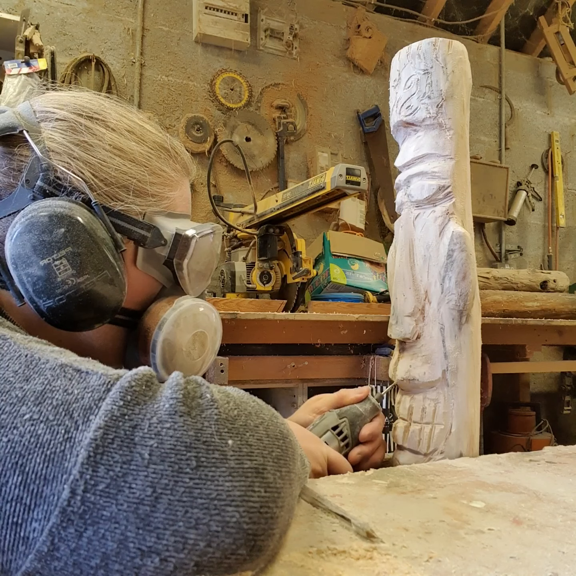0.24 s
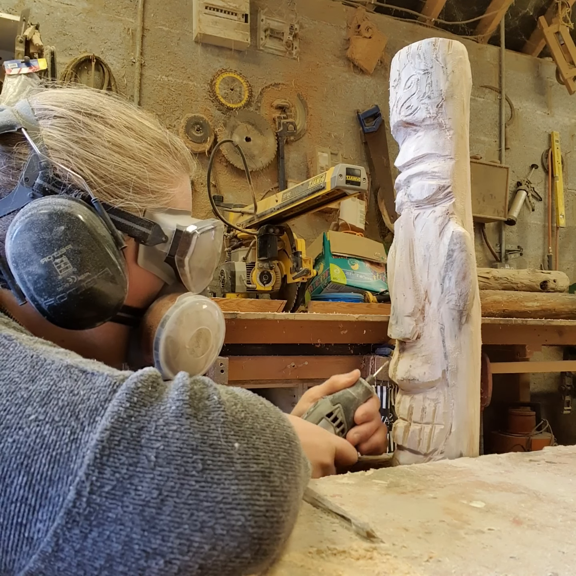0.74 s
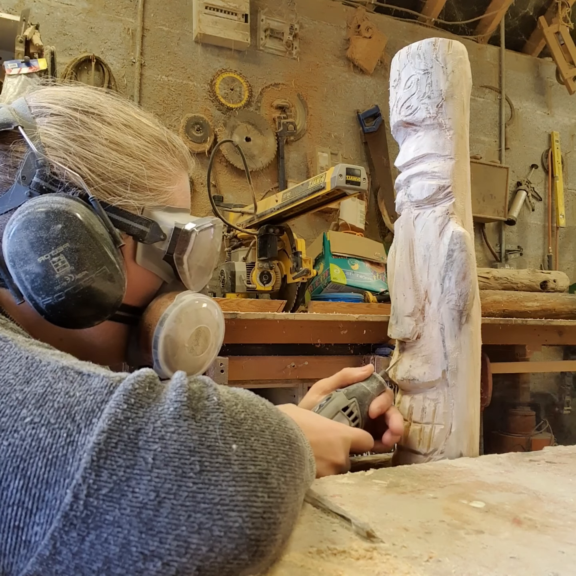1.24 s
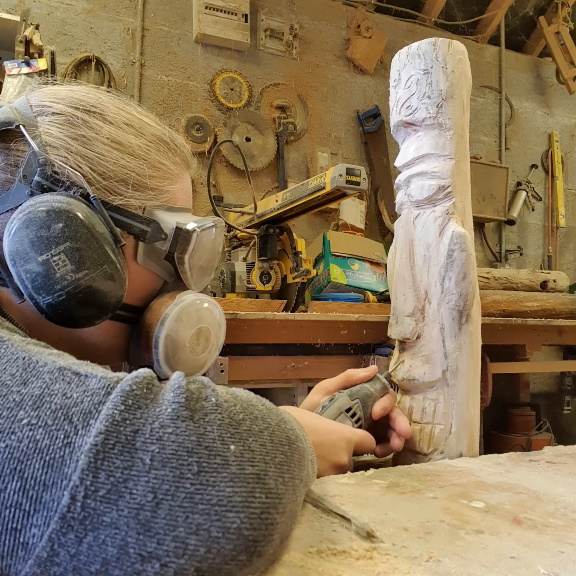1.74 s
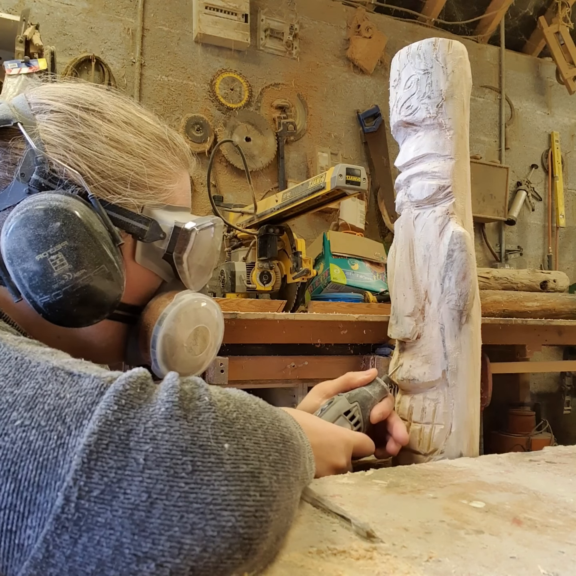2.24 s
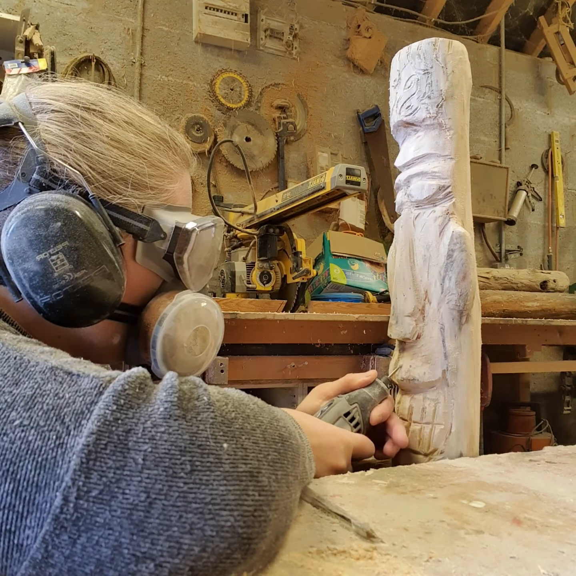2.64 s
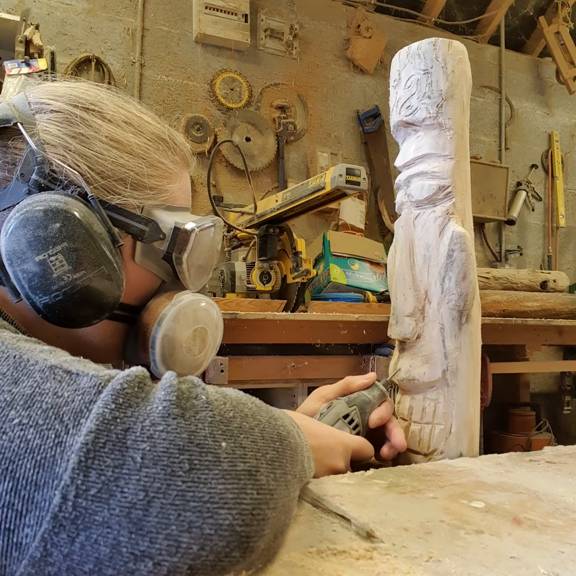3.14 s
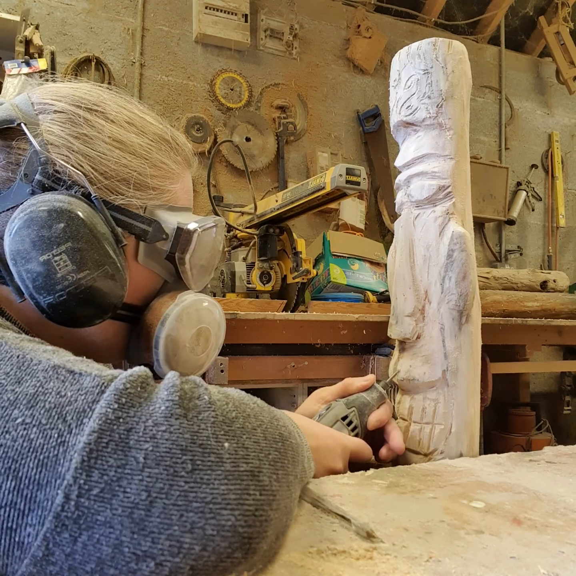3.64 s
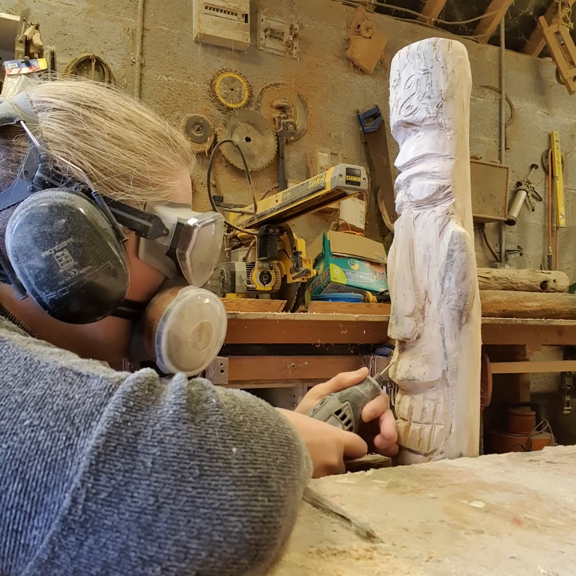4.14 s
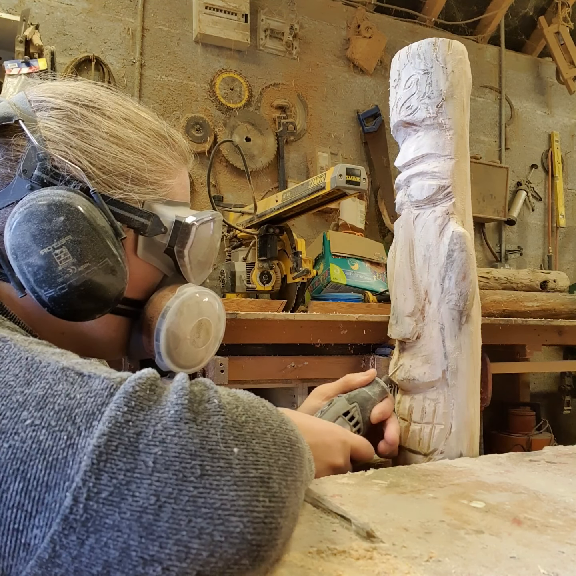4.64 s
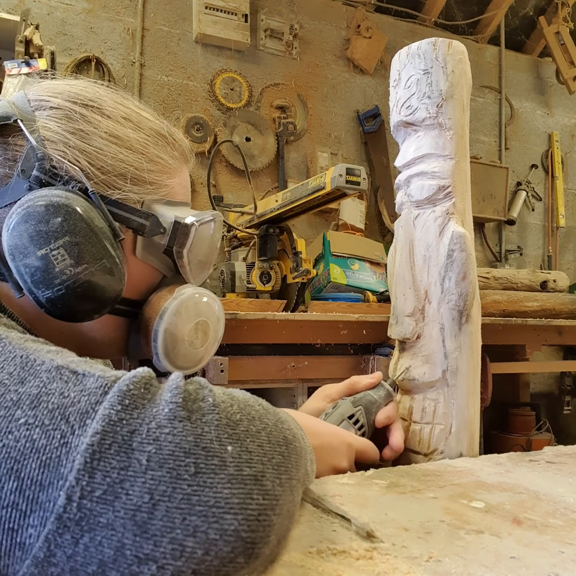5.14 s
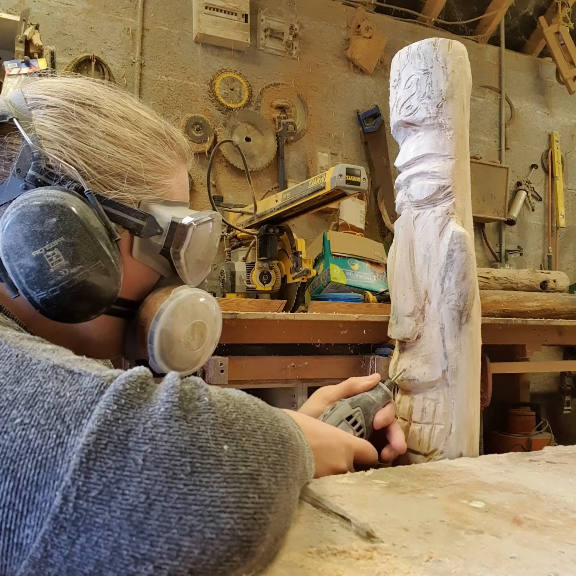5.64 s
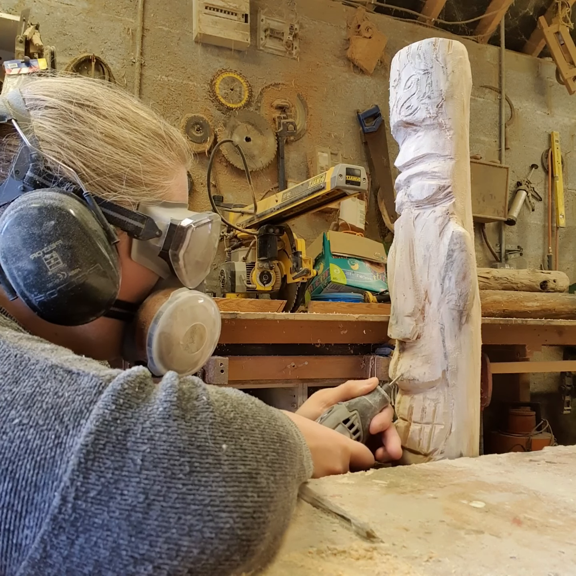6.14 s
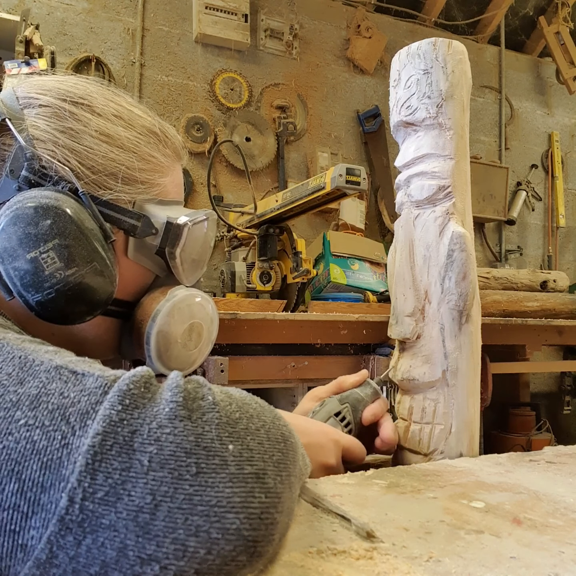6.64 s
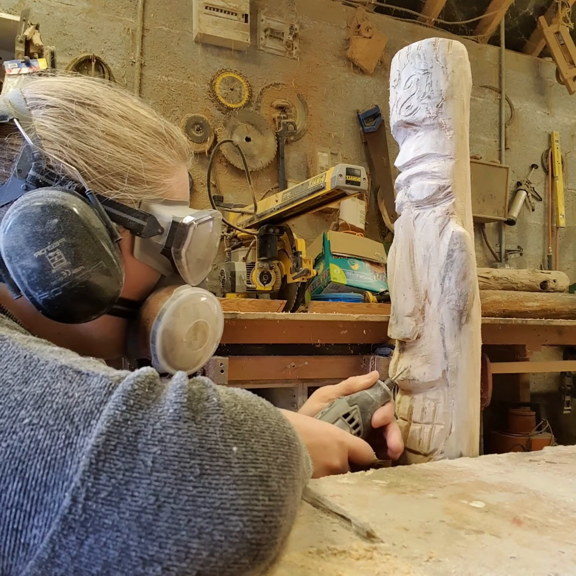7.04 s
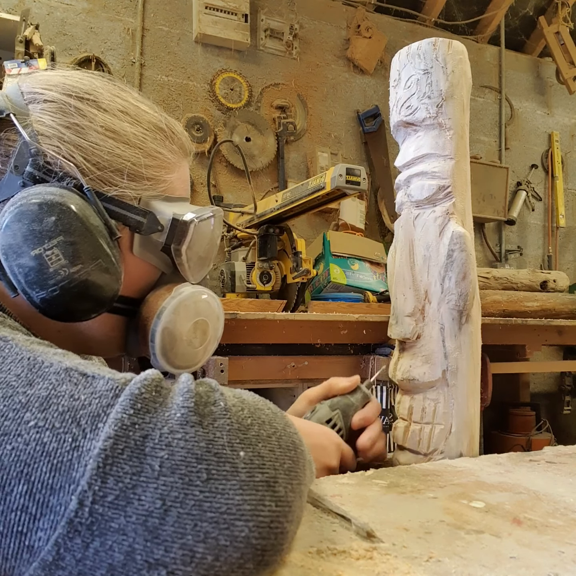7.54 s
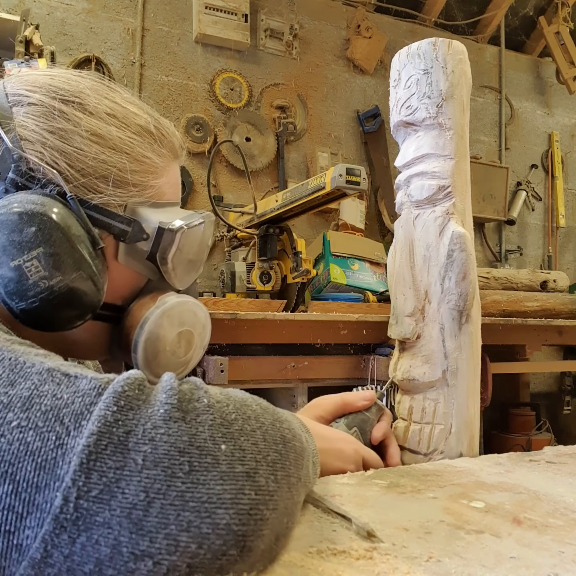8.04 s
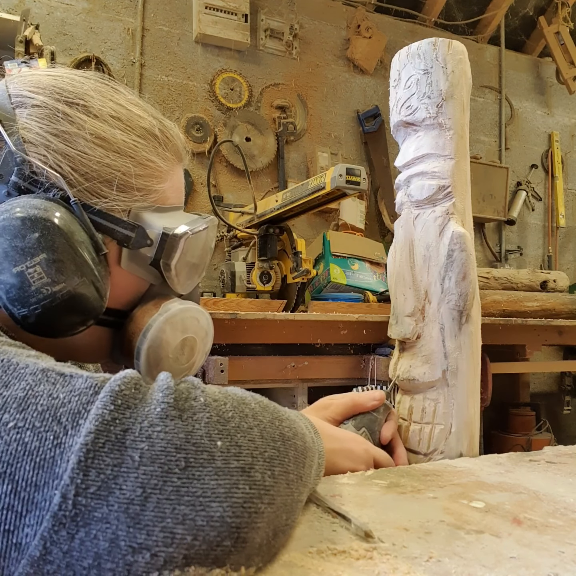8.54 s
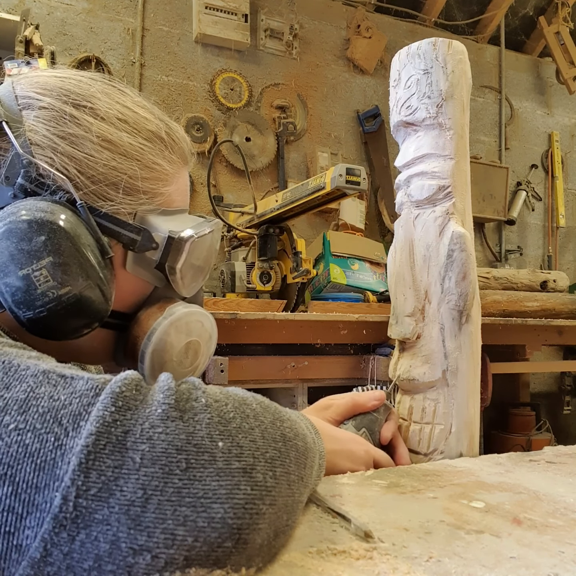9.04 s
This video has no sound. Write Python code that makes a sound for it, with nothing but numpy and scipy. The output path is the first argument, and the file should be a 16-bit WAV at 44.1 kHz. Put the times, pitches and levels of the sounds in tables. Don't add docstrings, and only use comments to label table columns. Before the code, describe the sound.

Continuous shrill motor whine with fan air and brush hiss, recorded close by a phone in a small, lightly reflective workshop. Whenever the spinning bit meets the wooden post, the tone drops a little and turns loud, ragged and nasal, with a low hum and fibrous rasp. Long gouging comes first, then stuttering jabs and a deep, labouring plunge, with clean whining between and brief light grazes last.

```python
import sys
import numpy as np
from scipy import signal
from scipy.fft import rfft, irfft
from scipy.io import wavfile
from scipy.ndimage import uniform_filter1d

SR = 44100
rng = np.random.default_rng(int(sys.argv[2]) if len(sys.argv) > 2 else 0)


def wrap_up_sound(samples):
    columns = np.atleast_2d(samples).T
    tamed = np.clip(columns, -1, 1)
    steps = np.round(tamed * 32767).astype(np.int16)
    wavfile.write(sys.argv[1], SR, steps)


def nominal_scale(level):
    x = np.asarray(level, float) / 20
    return 10 ** x


N = 410130
HZ = np.fft.rfftfreq(N, 1 / SR)
MAINS_RIPPLE_HZ, FREE_HZ = 100, 384
BEARING_ORDER = 4.915
NEW_SPOT_S = 8.4
MOVED = np.arange(N) > NEW_SPOT_S * SR


WHINE_ORDERS = (3, 8.92, 10.92, 17, 25, 26, 27, 32)
WHINE_DB = (-12.5, -23, -12.5, -15.5, -18, -20.5, -18, -13)
SLOT_SIDES_DB = (-17.5, -14.5, -11.5, -2.5, -12.5, -13.5, -16.5)
# time_s, half_length_s, change_db
SLOT_SWELLS = [(1.2, .1, 2.5), (2.22, .02, -8), (3.25, .12, -2), (0.17, .17, 5.5), (1.75, 0.084, -6),
               (5.38, .05, 2), (6.43, .04, 2.5), (6.15, .1, -2.5), (7.69, .035, -7), (8.3, .1, -2.5),
               (8.72, .13, 4), (8.95, 0.088, -12), (5.6, .04, 3), (7.45, .1, 2), (8.595, .03, -6),
               (9.2, .03, -9), (5.25, .1, 3)]
# time_s, half_length_s, change_db
LOWER_SWELLS = [
    (.18, 0.22, -9),
    (3, .2, -2),
    (4.4, .25, 0.5),
    (5.38, .04, -3),
    (6.1, .1, 6),
    (6.9, .3, 1.5),
    (8.1, 0.29, -6),
    (8.7, .15, -5),
    (6.43, 0.049, 4),
]
# time_s, half_length_s, change_db
UPPER_SWELLS = [
    (.18, 0.23, -9),
    (4.45, 0.3, 3),
    (2.45, 0.17, 2),
    (5.38, .04, -4),
    (5.5, 0.11, 3),
    (5.9, 0.11, -5),
    (7.15, 0.49, 3),
    (7.55, .1, 5),
    (8.75, .15, -8),
    (8.1, .3, -6),
]


def motor(turn, ripple):
    bearing_db, slots_db, bars_db = motor_levels()[:3]
    sag_hz = sag()
    bearing_phase = BEARING_ORDER * turn + 0.24 * walk(40)
    out = tone(bearing_phase, bearing_db + multiple_swell(BEARING_ORDER) + 0.89 * walk(12))

    lower_db, upper_db = swells(LOWER_SWELLS), swells(UPPER_SWELLS)
    slots = 0
    for k, db in enumerate(SLOT_SIDES_DB):
        side = k - 3
        side_db = db + lower_db * (side < 0) + upper_db * (side > 0)
        side_db = side_db + 0.5 * (side + 1) * (0.5 - sag_hz / 12) + 0.1347 * sag_hz * (side != 0)
        slots += nominal_scale(side_db) * np.cos(8 * turn + side * ripple + 0.08 * walk(5))
    out += np.sqrt(2) * nominal_scale(slots_db + swells(SLOT_SWELLS) + 1.26 * walk(11)) * slots

    ragged_db = 3 * seated() * walk(30)
    bars_phase = 24 * turn + 1.05 * walk(60)
    out += tone(bars_phase, bars_db + multiple_swell(24) + ragged_db + 2.004 * walk(13))

    for order, db in zip(WHINE_ORDERS, WHINE_DB):
        dulled_db = -0.16 * sag_hz * (order > 20)
        out += tone(order * turn, 0.6 * bearing_db - 13 + db + multiple_swell(order) + dulled_db + 1.6 * walk(3))
    return out


# time_s, casing_to_phone_db, vents_open_db, brush_cap_open_db
GRIP = [(0, -2, -0.5, -3.5), (.64, -1.5, 0, -3), (.81, -1.5, 1.5, 9), (1.14, 1.5, 2.5, -2),
        (1.45, 5, 1.5, -0.5), (1.8, 2, 1.5, 2), (2.5, 0.5, .5, -3.5), (2.96, 5, -0.5, -0.5),
        (3.45, 0, -1, -1), (4.14, 1, -2.5, 1), (4.88, 2, -0.5, 0.5), (5.5, 1, 2, 7), (5.93, 1.5, -0.5, -11),
        (6.4, -0.5, -0.5, -5), (6.78, 0, -2.5, -4), (7.4, 1, -2, -4), (7.7, -3, -1.5, -3), (8.75, -3, 2, 1),
        (8.95, -3, -0.5, 1)]


def motor_levels():
    casing_db, vents_db, cap_db = curves(GRIP)
    sag_hz = sag()
    bearing_db = -31.5 + 0.7 * casing_db + 3 * MOVED - 0.41 * sag_hz - seated() * (0.63 + 8 * MOVED)
    slots_db = -34.0 + 1.16 * casing_db + 0.051 * sag_hz
    bars_db = -34.0 + cap_db - 0.11 * sag_hz
    air_db = -56 + 0.71 * vents_db - 0.018 * sag_hz
    brush_db = -59.5 + 0.74 * vents_db + 0.42 * casing_db - 0.02 * sag_hz
    return bearing_db, slots_db, bars_db, air_db, brush_db


BITE_ORDERS = (4, 7, 9, 10, 13, 14, 15, 16, 35, 36, 37)
BITE_DB = (-24, -6.5, -16, -13.5, -21, -23, -22.5, -16.5, -29, -24.5, -34)
NEW_SPOT_DB = (2, -19, 1, 6.5, 11.5, -4, -2, 0, -5, -5, -2)
BITE_LEAN = (0.21, 0.38, 0.44, -0.25, 0, 0, 0, -0.13, -.4, -.5, -.4)
FLUTE_SKIPS_S = (.04, .1, 5.025, 5.16, 5.245, 5.315, 5.445, 5.53, 5.565, 6.5, 6.515, 8.49, 8.51, 8.585)
TWELFTH_SKIPS_S = (.12, 3.015, 3.165, 3.27, 3.69, 3.765, 3.82, 5.157, 5.235, 5.462, 5.49, 5.63, 6.325, 6.35,
                   6.395, 6.443, 6.487, 8.61, 8.75, 9.18)
ELEVENTH_SKIPS_S = (3.2, 3.358, 3.374, 3.6, 3.705, 6.29, 6.34, 6.385, 6.425, 6.44, 6.505)


def burr(turn, ripple, chatter):
    fifth_db, flute_db, eleventh_db, twice_db = cut_levels()
    hop_db = -3.0 * chatter * np.abs(walk(45))
    skip_db = hop_db + skips(TWELFTH_SKIPS_S) + 0.8 * MOVED * walk(45)
    out = tone(5 * turn + 0.22 * walk(15), fifth_db)

    flute_phase = 6 * turn + 0.31 * walk(70)
    struck_db = flute_db + 0.93 * walk(25) + 0.89 * hop_db + skips(FLUTE_SKIPS_S) + multiple_swell(6)
    out += tone(flute_phase, struck_db) * (1 + 0.12 * np.cos(ripple))

    twice_phase = 12 * turn + 0.4 * walk(70)
    out += tone(twice_phase, twice_db + 0.41 * walk(25) + 0.85 * skip_db + multiple_swell(12))

    eleventh_phase = 11 * turn + 0.28 * walk(70)
    shaken_db = eleventh_db + 1.6 * walk(24.87) + 0.54 * hop_db + skips(ELEVENTH_SKIPS_S) + multiple_swell(11)
    eleventh = tone(eleventh_phase, shaken_db)

    bite_db = uniform_filter1d(0.34 * flute_db + 0.64 * eleventh_db, size=SR // 30) + 0.58 * skip_db
    for order, db, change_db, lean in zip(BITE_ORDERS, BITE_DB, NEW_SPOT_DB, BITE_LEAN):
        lean_db = lean * (flute_db - eleventh_db - 7.5)
        out += tone(order * turn, bite_db + db + multiple_swell(order) + change_db * MOVED + lean_db + 1.2 * walk(4.6))
    return out + eleventh * ~MOVED, np.outer([1, -.55], eleventh * MOVED)


# time_s, half_length_s, fifth_multiple_db
GRAZES = [(0, .05, -35), (.5, .3, -46), (1.68, 0.055, -29), (1.79, 0.075, -27.5), (2.04, 0.086, -29),
          (3.32, .06, -33), (4.98, 0.076, -35), (5.19, 0.048, -25.5), (5.65, 0.15, -35), (6.11, 0.089, -34),
          (8.48, .07, -35), (9.11, 0.049, -35)]


def cut_levels():
    bite_db, side_db, depth_db = curves(STROKES)[1:]
    sag_hz, lifted = sag(), 1 - seated()
    steady = nominal_scale(0.44 * bite_db - 17.0 - 0.41 * sag_hz - 7.6 * MOVED - 3.3 * lifted) ** 2
    grazing = sum((bell * nominal_scale(db)) ** 2 for bell, db in bumps(GRAZES))
    fifth_db = 10 * np.log10(steady + grazing)
    eleventh_db = 0.55 * depth_db + 0.36 * bite_db + 0.5 * np.minimum(sag_hz, 24) - 16.0
    eleventh_db = eleventh_db + 9 * MOVED - 0.15 * (side_db + 29.5) - 4 * lifted
    return fifth_db, bite_db, eleventh_db, depth_db


# time_s, shaft_turns_hz, bite_db, side_load_db, depth_db
FINISH = [
    (0, 373, -35, -30.5, -32),
    (.13, 371.7, -32, -28, -40),
    (.21, 374.3, -33, -28.5, -34),
    (.33, 377.7, -35.5, -28.5, -36.5),
    (.44, 379, -39, -41.5, -42),
    (.57, 381.5, -47, -39, -31),
    (.68, 383, -48, -39, -39),
    (.92, 384, -54, -38.5, -37),
]
SCORE = [
    (1.57, 384.7, -47, -39, -32),
    (1.73, 382.5, -37, -34.5, -33),
    (1.86, 379.5, -34, -24, -25.5),
    (1.98, 373.4, -26.5, -24.5, -26),
    (2.1, 372.8, -29.5, -30, -35.5),
    (2.18, 369.5, -23, -30.5, -40),
    (2.279, 367.3, -23, -33.5, -30.5),
    (2.5, 365.8, -28.5, -32.5, -26),
]
GOUGE = [
    (2.63, 364.7, -29, -31.5, -21),
    (2.76, 360, -28.5, -28.5, -27),
    (3.02, 361.5, -24.5, -28.5, -29.5),
    (3.25, 356.9, -21.5, -29.5, -25),
    (3.46, 361.1, -22, -30, -23),
    (3.6, 358.5, -24, -30.5, -24.5),
    (3.82, 363, -31, -29.5, -31),
    (3.91, 372.3, -26, -36, -33),
    (4.02, 382.2, -55, -39, -35),
]
JABS = [
    (4.92, 385.6, -46, -43.5, -30.5),
    (5.01, 383, -38, -28.5, -31.5),
    (5.05, 381.5, -27, -26.5, -27),
    (5.09, 379.5, -26.5, -28, -26),
    (5.19, 374.6, -26.5, -28, -30),
    (5.28, 373, -26.5, -22.5, -28.5),
    (5.38, 373, -43, -29, -29),
    (5.43, 374.2, -27, -31, -30),
    (5.52, 376.8, -29.5, -24, -32.5),
]
PLUNGE = [
    (5.63, 370.4, -20.5, -24.5, -27),
    (5.8, 358.8, -27.5, -27, -23.5),
    (5.94, 357.4, -22.5, -27.5, -28),
    (6.09, 362.2, -17.5, -27, -33),
    (6.22, 361.3, -20.5, -27, -31.5),
    (6.4, 349.7, -28, -23, -20.5),
    (6.51, 355.4, -33, -26.5, -19),
    (6.59, 371.7, -27, -37.5, -32),
    (6.645, 380.6, -52, -40, -32),
]
TOUCH = [
    (8.23, 385, -52, -40, -34),
    (8.42, 381.3, -64, -38, -43),
    (8.46, 382, -37, -43, -39),
    (8.56, 378.7, -40, -33, -34),
    (8.64, 377.3, -33, -33.5, -28),
    (8.7, 376.3, -32, -35.5, -26.5),
    (8.8, 376, -29.5, -34.5, -27.5),
    (8.84, 377, -34, -36, -35),
    (8.88, 378, -58, -35.5, -43),
]
RETOUCH = [
    (9.02, 380.4, -57, -35, -50),
    (9.07, 381.3, -35, -35, -46),
    (9.14, 380.7, -34, -37.5, -41),
    (9.22, 377.5, -31, -36, -34),
    (9.3, 375, -35, -35.5, -24),
]
STROKES = FINISH + SCORE + GOUGE + JABS + PLUNGE + TOUCH + RETOUCH
# time_s, shaft_turns_hz
IDLE = [(1.07, 384), (1.32, 382.7), (4.08, 382.7), (4.22, 382.3), (4.73, 383.4), (4.83, 387.1), (6.72, 383),
        (6.84, 385.5), (7.1, 387), (7.48, 383), (7.9, 383.5), (7.99, 385.4)]


def speed():
    return curves(sorted(IDLE + [row[:2] for row in STROKES]))[0]


def sag():
    return FREE_HZ - speed()


def seated():
    lifted_db, seated_db, settle_s = -51.5, -35, 0.15
    share = np.clip((curves(STROKES)[1] - lifted_db) / (seated_db - lifted_db), 0, 1)
    return uniform_filter1d(share, size=int(settle_s * SR))


def skips(times):
    return swells([(s, 0.009, -13) for s in times])


# time_s, half_length_s, change_db Third
THIRD = [
    (2.4, .45, 5.5),
    (5.7, 0.45, 5),
    (3.42, 0.43, 4),
    (9.05, .2, 7),
    (9.3, .2, 6.5),
]
SIXTH = [(5.2, 0.028, -3), (5.268, 0.012, 1), (4.99, 0.027, -6), (.06, .04, -3), (5.88, 0.09, -2),
         (0.192, .01, -6), (0.255, .01, -6), (6.333, .01, -5), (6.46, .01, -6), (3.15, .1, -2),
         (.42, 0.055, -10), (5.37, 0.029, -3), (8.87, 0.032, -10), (6.65, 0.026, -5), (8.55, 0.054, 1)]
SEVENTH = [(.15, .2, 7), (2.93, 0.079, 2), (3.4, .15, -1), (2.4, .17, -8), (2.72, .12, 5), (5.05, 0.055, 7),
           (5.5, .1, 2), (6.4, 0.11, -11), (6.6, .06, -10), (8.775, .03, 5), (3.2, .08, -4)]
NINTH = [
    (1.75, 0.14, 12),
    (2.1, 0.1, 13),
    (2.5, .1, 3),
    (3.3, .1, -8),
    (5.1, .2, 8),
    (5.6, .2, 10),
    (6.1, 0.091, -6),
    (6.5, 0.078, 5),
    (9.1, .1, 7),
]
TENTH = [(3.25, .05, 4), (3.79, .07, 11), (5.74, .025, 7), (6.36, .02, -6), (6.43, .015, -14),
         (6.53, .03, -3), (2.8, .4, -7), (3.53, .32, 1.5), (5.11, 0.042, 16), (5.6, .15, 6), (6.4, .025, 7),
         (6.47, .03, 9), (8.66, 0.024, 9), (8.7, .012, -9), (9.27, .04, 7), (9.215, .02, -2)]
ELEVENTH = [(.16, .11, -9), (2.25, 0.049, -10), (3.12, 0.063, -2), (5.6, .04, -9), (3.28, 0.058, 1.5),
            (3.47, .08, 2.5), (5.25, .015, 7), (5.47, .02, 8), (6.32, 0.024, 5), (6.55, 0.045, -4),
            (8.565, .022, 17.5), (5.71, .06, 4)]
TWELFTH = [(5.66, .035, -5), (5.97, .012, -8), (6.14, 0.013, -10), (8.79, .02, 3), (1.25, .2, 2.5),
           (2.75, .05, 2), (7.88, 0.07, 3.5), (7.66, .1, -4), (8.57, 0.039, -7), (3.11, .05, 2),
           (6.338, .012, 4), (3.735, 0.017, 3.5), (5.12, 0.026, 5.5), (8.65, .035, -5), (8.71, .03, 4),
           (8.865, .03, 9), (9.25, .045, 3), (9.15, 0.014, 7), (6.415, .025, -4), (.165, .02, 4),
           (8.47, .03, 4), (2.92, .015, -8)]
THIRTEENTH = [
    (1.9, .1, 6),
    (3.16, .05, 6),
    (5.2, .2, 9),
    (8.7, .11, 8),
    (6.34, .025, 7),
    (6.47, .03, 6),
    (9.245, .04, 5),
]
FIFTEENTH = [
    (2.2, .15, 8),
    (3.3, .05, 5),
    (3.76, 0.083, 15),
    (6, .2, -10),
    (8.7, 0.09, -5),
]
SIXTEENTH = [
    (3.1, .05, 1),
    (3.3, .1, 3),
    (3.48, .07, -6),
    (3.63, 0.059, 4),
    (4.2, .2, 8),
    (5.3, .1, 9),
]
BARS = [(3.15, 0.19, 4), (3.5, .1, -4), (8.3, 0.069, -6), (8.67, .03, 5), (8.75, .04, -2), (8.91, .03, -8),
        (9.2, 0.044, -3.5), (7.53, .12, 8), (8.46, .1, -12), (8.84, .025, -8), (9.125, .04, -11),
        (9.27, .04, -8)]
BESIDE_BARS = [
    (8.72, .15, 9),
    (9.15, .12, 9),
]
FAN = [
    (7, .25, -4),
    (1.4, .2, 2),
    (4.2, .2, -3),
    (5.5, .1, 6),
    (7.4, .15, 4),
    (8.2, 0.48, -9),
]
TOP = [
    (3.1, 0.091, 8),
    (3.4, .08, 8),
    (3.72, .12, 12),
]
BEARING = [
    (1.45, 0.22, 2),
    (2.4, .2, -4),
    (3.95, .08, 1.5),
    (5.55, .12, -5),
    (6.1, 0.14, -3),
    (6.35, 0.11, -3),
    (8.7, .12, -6),
    (9.015, .03, -5),
    (9.29, .03, -5),
]
MULTIPLE_SWELLS = {3: THIRD, 6: SIXTH, 7: SEVENTH, 9: NINTH, 10: TENTH, 11: ELEVENTH, 12: TWELFTH, 13: THIRTEENTH,
                   15: FIFTEENTH, 16: SIXTEENTH, 24: BARS, 25: BESIDE_BARS, 32: FAN, 36: TOP, BEARING_ORDER: BEARING}


def multiple_swell(order):
    return swells(MULTIPLE_SWELLS.get(order, []))


# time_s, half_length_s, wobble_share_0_1
THROBS = [
    (.42, .08, .35),
    (1.55, 0.055, .2),
    (1.73, .12, 0.25),
    (1.95, .08, .06),
    (8.56, .09, .35),
    (9.12, .06, .3),
]


def post(turn, ripple):
    hum_db, third_db, double_db = hum_levels()[:3]
    side_db = curves(STROKES)[2]
    retouching = np.arange(N) > RETOUCH[0][0] * SR
    wobble = tone(turn + 0.026 * walk(60), side_db + 0.86 * walk(40))
    throb = 0.06 + (0.2 * MOVED + 0.4 * retouching) * (hum_db > -58)
    wobble *= 1 + throb * np.cos(ripple)
    wobble += swells(THROBS) * tone(turn - ripple, side_db)
    double = tone(2 * turn + 0.042 * walk(55), double_db + 0.74 * walk(20)) * (1 + 0.32 * np.cos(ripple))
    hum = tone(ripple, hum_db + 0.42 * walk(8.2))
    hum += tone(4 * ripple, hum_db - 9.5) + tone(2 * ripple, hum_db - 16.5)
    hum += tone(3 * ripple, third_db + 1.5 * walk(12))
    return wobble + double + hum


# time_s, half_length_s, change_db
LULLS = [(.35, 0.11, -4), (.6, 0.13, -20), (.97, .06, -12), (1.22, 0.028, -14), (1.37, 0.049, -11.5),
         (1.6, 0.15, -7), (1.9, 0.31, -7), (4.1, 0.26, -1.5), (4.3, 0.034, -4), (4.47, 0.043, -10),
         (4.77, 0.033, -7), (6.4, 0.31, -2.5), (7.77, 0.12, -20), (6.9, .15, -4), (7.12, .04, -14),
         (7.55, .02, -8), (8.24, 0.16, -14), (8.42, 0.081, -9), (8.93, .02, -12), (9.03, .04, -14)]
# time_s, half_length_s, change_db
EASES = [
    (1.85, .2, 0),
    (5.363, .12, -24),
    (6.4, 0.27, -6),
]


def hum_levels():
    seat, sag_hz = seated(), sag()
    lull_db = sum(bell * db for bell, db in bumps(LULLS))
    ease_db = sum(bell * db for bell, db in bumps(EASES))
    hum_db = -69 + 0.45 * lull_db + seat * (22 + 0.21 * sag_hz + ease_db)
    third_db = -64.0 + seat * (6 + 0.68 * sag_hz + 0.8 * ease_db)
    load_db = 0.71 * np.minimum(sag_hz, 15) - 0.52 * np.maximum(sag_hz - 22, 0)
    double_db = -55 + seat * (7 + load_db - 5 * MOVED)
    return hum_db, third_db, double_db, -56.5 + lull_db


# pitch_hz, density_db_per_hz
CHIPS = [(250, -51), (320, -56), (450, -53), (750, -52.5)]


def chips():
    edges_db = -60 * ((HZ < CHIPS[0][0]) | (HZ > CHIPS[-1][0]))
    return hiss(over_hz(CHIPS)[0] + edges_db) * nominal_scale(curves(STROKES)[2] + 1.2 * walk(25))


# pitch_hz, density_db_per_hz
AIR = [(230, -78.5), (300, -74.5), (550, -69), (730, -68.5), (950, -65.5), (1270, -66.5), (1650, -69),
       (2200, -65), (2900, -65), (3800, -65), (5000, -68.5), (6600, -73), (8500, -79), (11500, -75.5),
       (14500, -81.5)]
# pitch_hz, density_db_per_hz
RUMBLE = [(20, -19), (60, 1), (80, 5), (140, 0.5), (240, 4), (400, 3)]


def air(turn, ripple):
    air_db, brush_db = motor_levels()[3:]
    colour_db = over_hz(AIR)[0]
    colour_db = colour_db - 60 * (HZ < AIR[0][0]) * np.log(AIR[0][0] / (HZ + 1))
    high = 1 / (1 + (5800 / (HZ + 1)) ** 6)
    fan = hiss(colour_db + 10 * np.log10(1 - high + 1e-12)) * nominal_scale(air_db + 55 + 0.45 * walk(5.5))
    brush = hiss(colour_db + 10 * np.log10(high)) * nominal_scale(brush_db + 62.5 + 0.48 * walk(11))
    rumble_colour_db = over_hz(RUMBLE)[0] - 22 - 60 * (HZ > RUMBLE[-1][0])
    shop = hiss(rumble_colour_db) * nominal_scale(hum_levels()[3] + 2.15 * walk(14))
    fan *= 1 + 0.018 * np.cos(ripple)
    brush *= 1 + 0.092 * np.cos(ripple) + 0.27 * np.cos(turn)
    return fan + brush + shop


def workshop(x):
    t60_s, level_db = 0.25, -13
    t = np.arange(SR // 2) / SR
    tail = rng.standard_normal((2, len(t))) * 1000 ** (-t / t60_s) * (t > .003)
    tail = signal.sosfilt(signal.butter(2, 900, "high", fs=SR, output="sos"), tail)
    tail *= nominal_scale(level_db) / np.sqrt(np.sum(tail ** 2) / 2)
    return signal.fftconvolve(x[None], tail, axes=1)[:, :N]


def ports(spectrum, pan_db, lead):
    lead = lead - 2 * np.pi * HZ * 2.02 / SR
    return np.array([spectrum * nominal_scale(pan_db / 2) * np.exp(1j * lead), spectrum * nominal_scale(-pan_db / 2)])


# pitch_hz, left_minus_right_db, left_lead_rad (beyond the path lag), hiss_likeness_0_1
PORTS = [(100, 0.5, 0.5, 0.96), (547, 0, -0.5, 0.99), (740, 0.5, 0.5, 0.84), (896, -9.5, 0.73, 0.21),
         (1400, 5.5, 2.5, 0.42), (1670, 6.5, 4.5, 0.62), (1910, 0.5, 5.5, 0.23), (2250, 6.5, 7, 0),
         (2650, -0.5, 6.5, 0.38), (3620, 2, 5.5, 0.93), (5220, -2, 6.5, 0.4), (6280, 3.5, 6, 1),
         (9070, 1.5, 6.5, 0.06), (9700, -1.5, 8, 0.23)]


def hiss(colour_db):
    pan_db, lead, like = over_hz(PORTS)
    like = np.clip(like, 0, 1)
    shared, left, right = rfft(rng.standard_normal((3, N))) * nominal_scale(colour_db) * np.sqrt(SR / 2)
    diffuse = np.array([left * nominal_scale(pan_db / 2), right * nominal_scale(-pan_db / 2)])
    return irfft(np.sqrt(like) * ports(shared, pan_db, lead) + np.sqrt(1 - like) * diffuse, N)


def tone(phase, db):
    return np.sqrt(2) * nominal_scale(db) * np.sin(phase + 2 * np.pi * rng.random())


def walk(rate):
    hold = max(int(SR / rate), 1)
    steps = np.repeat(rng.standard_normal(N // hold + 1), hold)
    return 1.44 * uniform_filter1d(uniform_filter1d(steps, hold), hold)[:N]


def swells(table):
    t, out = np.arange(N) / SR, np.zeros(N)
    for s, length, db in table:
        near = slice(max(int((s - 2 * length) * SR), 0), int((s + 2 * length) * SR))
        out[near] += db * np.exp(-((t[near] - s) / length) ** 4)
    return out


def bumps(table):
    t = np.arange(N) / SR
    return [(np.exp(-((t - s) / length) ** 2), db) for s, length, db in table]


def curves(table):
    s, *columns = np.transpose(table)
    return [np.interp(np.arange(N) / SR, s, c) for c in columns]


def over_hz(table):
    hz, *columns = np.transpose(table)
    return [np.interp(np.log(HZ + 1), np.log(hz), c) for c in columns]


# pitch_hz, left_minus_right_db, left_lead_rad
POST_PORTS = [(100, -2.5, -0.26), (339, -9.5, -1.6), (395, 0, 0.041), (760, -3, -0.79)]


def scene():
    speed_hz = speed()
    turn = 2 * np.pi * np.cumsum(speed_hz + 0.223 * walk(12)) / SR
    ripple = 2 * np.pi * MAINS_RIPPLE_HZ * np.arange(N) / SR
    change_hz_per_s = np.abs(np.gradient(speed_hz)) * SR
    chatter = np.tanh(uniform_filter1d(change_hz_per_s, size=SR // 5) / 35)
    cut, out_of_step = burr(turn, ripple, chatter)
    whine = motor(turn, ripple) + cut
    direct = ports(rfft(whine), *over_hz(PORTS)[:2])
    direct += ports(rfft(post(turn, ripple)), *over_hz(POST_PORTS))
    pan = nominal_scale(np.outer([.5, -.5], 5 * MOVED * seated()))
    return irfft(direct, N) * pan + out_of_step + workshop(whine) + air(turn, ripple) + chips()


def band_limit(x):
    return signal.sosfilt(signal.butter(12, 14790, fs=SR, output="sos"), x)


def record(dry):
    for low_hz, high_hz, gate_db in ((0, 175, -61.5), (135, 250, -60)):
        bass = irfft(rfft(dry) * (HZ >= low_hz) * (HZ < high_hz), N)
        faint = uniform_filter1d(bass.mean(axis=0) ** 2, size=1100) < nominal_scale(2 * gate_db)
        dry = dry - bass * uniform_filter1d(1. * faint, size=700)
    top = signal.ellip(10, .2, 70, 14530, fs=SR, output="sos")
    mix = signal.sosfilt(top, dry)
    return band_limit(mix)


dry = scene()
out = record(dry)
wrap_up_sound(out)
```